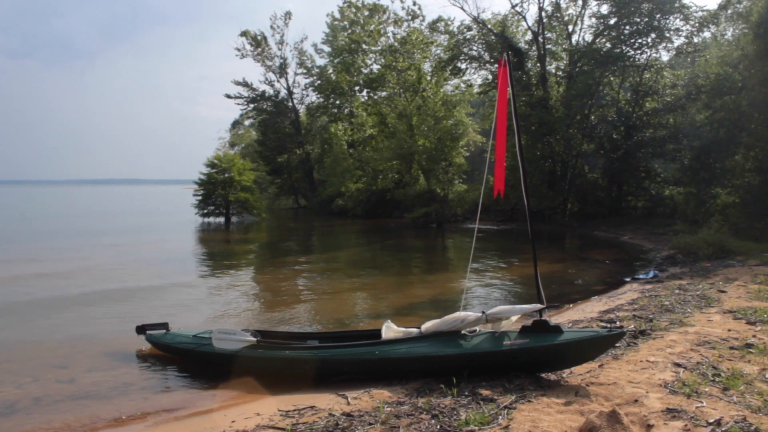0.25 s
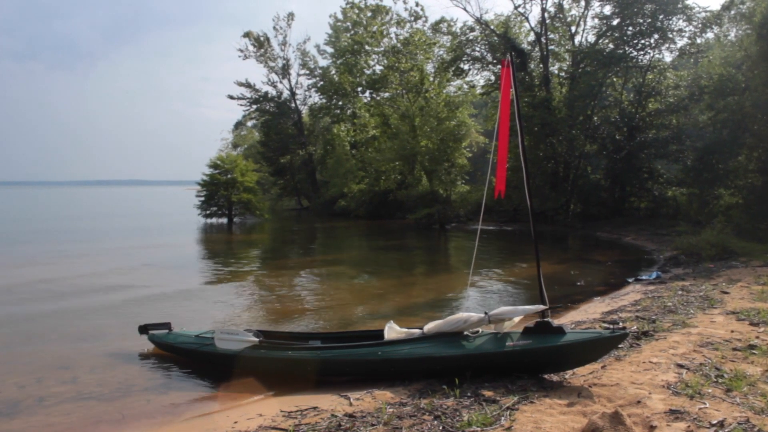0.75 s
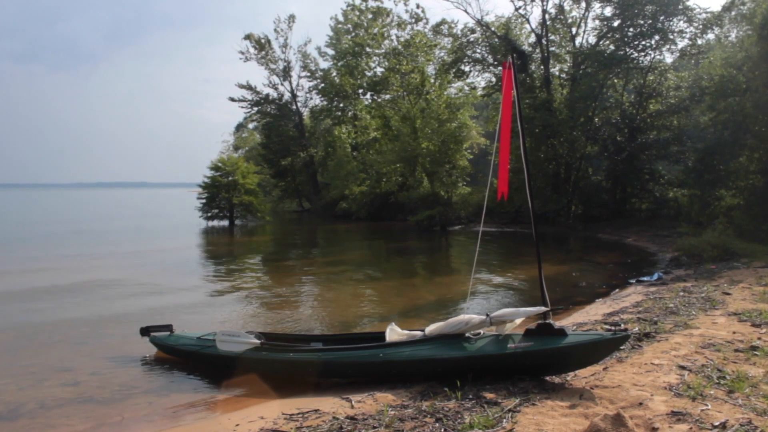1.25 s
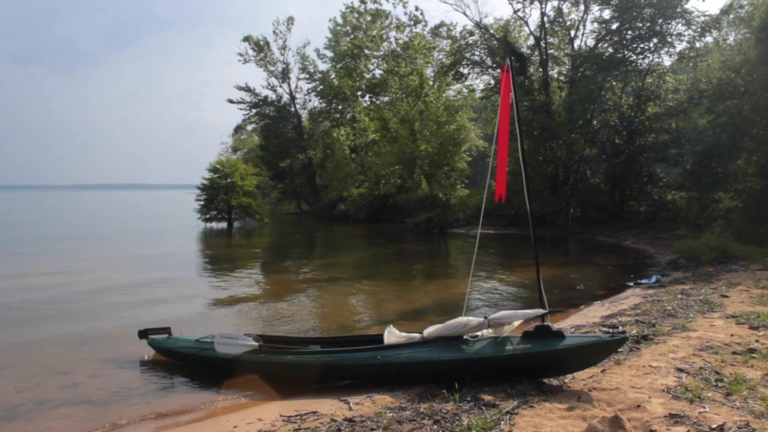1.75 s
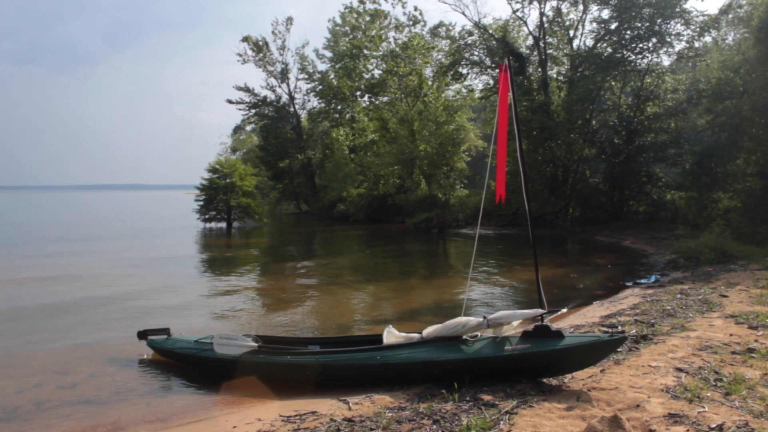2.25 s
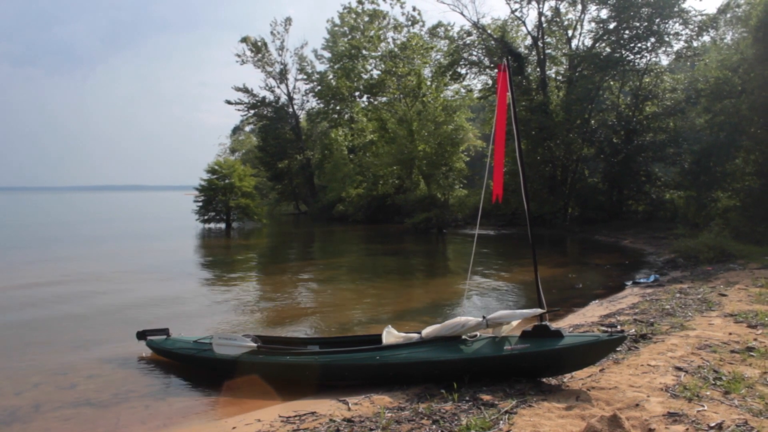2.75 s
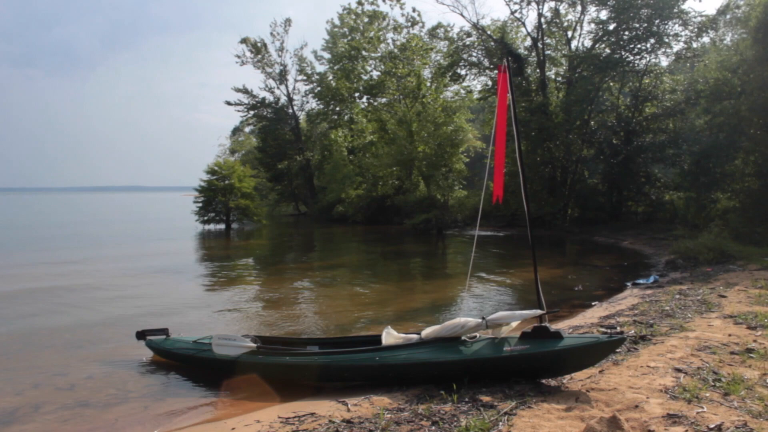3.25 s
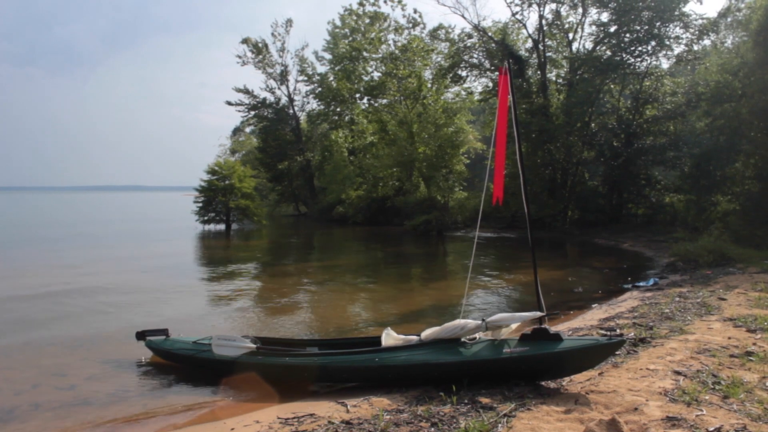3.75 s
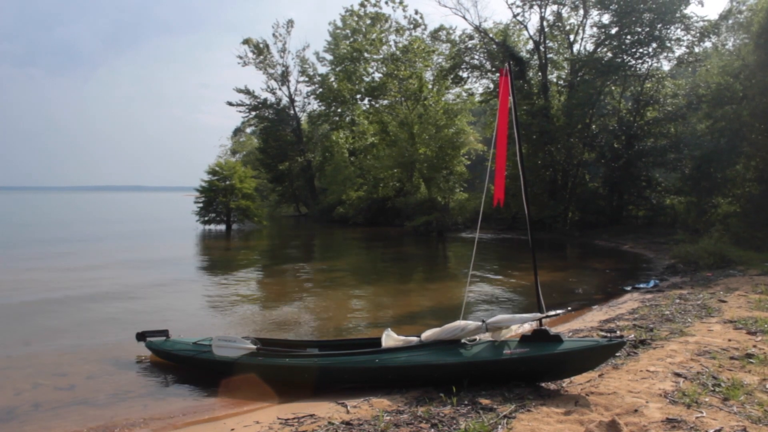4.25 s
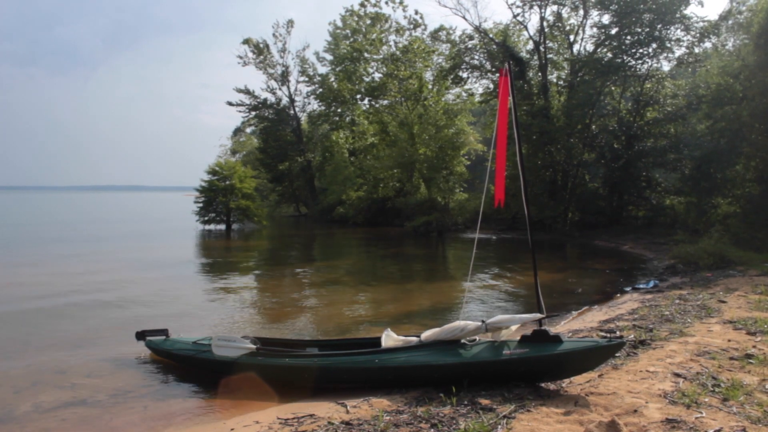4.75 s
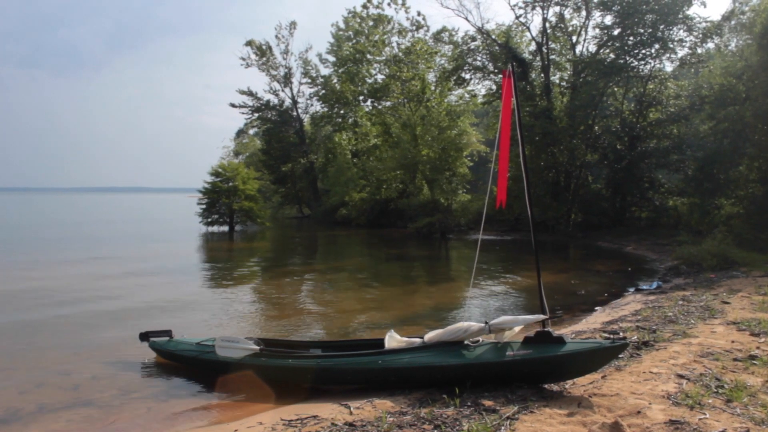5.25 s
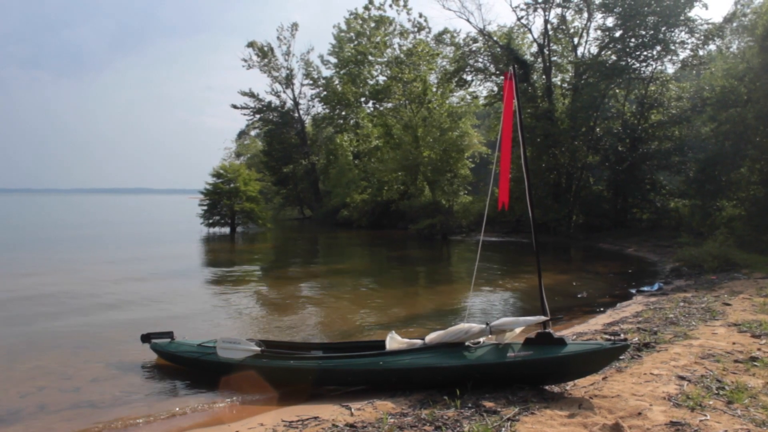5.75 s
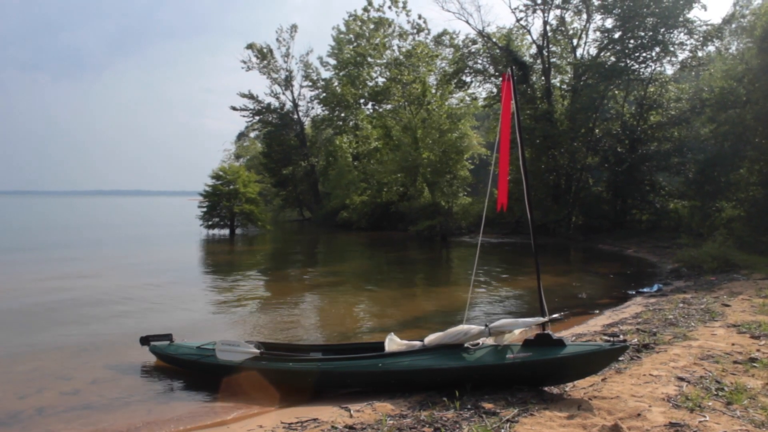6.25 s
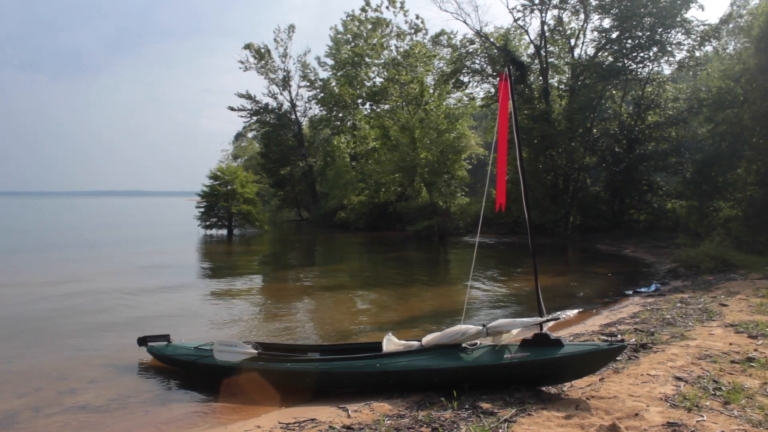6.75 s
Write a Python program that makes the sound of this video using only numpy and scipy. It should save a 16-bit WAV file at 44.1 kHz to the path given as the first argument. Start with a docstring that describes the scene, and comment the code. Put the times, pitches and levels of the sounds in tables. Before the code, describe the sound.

Small waves lap a sandy lake shore close to the microphone, sloshing with bubbles, gurgles, plinks and light splashes. The water eases briefly in the middle, then returns in two stronger washes, each trailing a soft hiss of foam. A songbird whistles short slurred phrases about once a second, echoing slightly off the trees, with fainter calls farther away. A low distant drone and soft open air lie underneath.

```python
"""Lapping lake shore with songbirds

Small waves lap the sand beside a beached kayak, trapping air that rings as clouds of bubbles,
with gulps, rising gurgles, smacks, spray and a hiss of foam on top.
Songbirds whistle short slurred phrases, and the bank and trees echo them.
Underneath sits a bed of low far drone and softly hissing open air."""
import sys
import numpy as np
from scipy import signal
from scipy.fft import rfft, irfft
from scipy.io import wavfile
from scipy.ndimage import uniform_filter1d

SR = 44100
rng = np.random.default_rng(int(sys.argv[2]) if len(sys.argv) > 2 else 0)


def store_wav(level_fs):
    """Save 16-bit WAV to argv[1]."""
    pcm = np.round(np.clip(np.atleast_2d(level_fs), -1, 1) * 32767)
    wavfile.write(sys.argv[1], SR, pcm.T.astype(np.int16))


N = 308700
TIME = np.arange(N) / SR
BINS = np.fft.rfftfreq(N, 1 / SR)

# waves running up the sand, with relative layer levels:
# (arrival [s], length [s], big bubbles [dB], small bubbles [dB], spray [dB])
WAVES = [(-.1, 0.49, -59, -51, -56.5), (0.36, .27, -53.5, -46, -52), (1.664, 0.79, -57, -51.5, -52.5),
         (2.682, 0.65, -64, -56, -65), (4.026, 0.24, -52, -48.5, -52.5), (4.199, 0.4, -49, -44.5, -52),
         (5.714, .12, -54.5, -45.5, -52), (5.826, 0.42, -50.5, -44.5, -47.5),
         (6.268, 0.36, -48, -45.5, -55), (6.67, 0.25, -75, -50.5, -60)]
# ripples between waves, on the same scale: (big bubbles [dB], small bubbles [dB], spray [dB])
LULL_DB = (-65, -69.5, -66)
# tone of the bubble clouds: (frequency [Hz], gain [dB])
WATER_EQ = [(150, -30), (280, -10.5), (450, -1.5), (900, 1), (1600, 2.5), (2400, 0.5), (3500, -6),
            (4700, -9), (7000, -16.5), (10000, -31.5), (15000, -20)]
# single close bubbles: (time [s], pitch [Hz], level [dB])
BUBBLES = [(.209, 7350, -37), (.567, 2400, -26.5), (.636, 2740, -27), (.718, 2130, -33.5),
           (.718, 1270, -33), (.795, 402, -37.5), (.8914, 2370, -22), (1.492, 6700, -37),
           (1.707, 1030, -36), (1.747, 648, -34), (1.796, 3020, -29.5), (1.878, 1790, -28.5),
           (1.888, 2110, -29), (1.896, 1170, -30.5), (2.254, 563, -40), (2.343, 1840, -28.5),
           (2.855, 823, -36), (3.882, 3330, -34.5), (4.004, 5570, -32), (4.028, 554, -36.5),
           (4.138, 3160, -28.5), (4.33, 1490, -28), (4.397, 525, -39), (4.434, 1800, -26.5),
           (4.458, 280, -26), (4.513, 477, -31), (4.616, 286, -32.5), (4.735, 1277, -28),
           (5.606, 6660, -31.5), (5.722, 530, -36), (5.765, 563, -39.5), (5.999, 435, -33.5),
           (6.116, 1605, -26), (6.535, 417, -36), (6.562, 584, -37), (6.586, 413, -33.5),
           (6.756, 2650, -28.5), (6.892, 386, -32.5), (6.93, 1640, -24.5), (6.93, 1100, -31.5)]
# shrinking air pockets: (time [s], length [s], start pitch [Hz], relative level [dB])
GURGLES = [(.853, 0.026, 1074, -40.5), (.886, 0.024, 860, -34), (2.447, 0.042, 803, -41.5),
           (2.465, 0.026, 905, -45), (4.3, 0.037, 670, -36.5), (4.466, 0.05, 599, -37),
           (4.556, 0.055, 600, -39), (4.7, 0.038, 590, -38), (6.112, .018, 1140, -29.5),
           (6.127, 0.022, 1886, -35), (6.39, 0.025, 820, -39)]
# drops and crests hitting the surface: (time [s], peak [dB], centre [Hz], width [octaves])
SMACKS = [(.025, -26.5, 2920, 0.45), (.243, -29.5, 4200, 0.72), (.687, -33, 4400, .39),
          (1.714, -34, 4000, 0.22), (1.925, -42, 4700, .3), (1.97, -39, 4570, 0.25),
          (2.04, -32.5, 3960, .25), (2.353, -26.5, 10190, 2.1), (2.857, -35, 3500, 1.8),
          (4.105, -32.5, 7250, 0.46), (4.138, -26.5, 2500, 1.7), (4.458, -27.5, 1300, 0.64),
          (4.603, -29, 6000, 1.5), (4.616, -29.5, 13200, 0.6), (5.8724, -21, 4350, 0.41),
          (5.898, -29, 3960, .3), (5.975, -31, 4560, 0.26), (6.075, -26.5, 4720, 0.29),
          (6.882, -29, 2300, .5)]
# foam as a spent wave drains through the sand: (start [s], end [s], level [dB])
FOAM = [(4.252, 4.564, -56.5), (6.24, 6.82, -56.5)]
# tone of the foam: (frequency [Hz], gain [dB])
FOAM_EQ = [(3000, -23), (5500, 1), (6800, 0.5), (8200, -5), (10500, -16), (14500, -7)]
# five bird phrases, a slur per row: (delay [s], length [s], start pitch [Hz], goal pitch [Hz], peak [dB])
REFRAIN = [(-.008, .125, 2817, 2480, -39.5), (.175, .08, 3440, 2900, -28),
           (0.356, 0.0724, 2600, 2988, -27.5), (0.402, .1, 2690, 2640, -35.5)]
ARCH = [(0, 0.072, 2150, 2360, -46.5), (.1, 0.067, 2380, 2680, -36.5), (.24, 0.051, 2765, 3080, -34.5),
        (.268, .105, 3270, 1956, -35), (.44, .125, 2200, 2900, -40.5)]
FALL = [(0, 0.053, 3180, 2450, -45.5), (.05, 0.0975, 3276, 3050, -35), (0.206, .14, 3270, 2500, -35)]
DIP = [(0, 0.084, 2480, 2160, -41.5), (0.094, 0.0925, 2330, 2693, -35.5)]
SWOOP = [(0, .125, 3464, 2555, -33), (.133, 0.0678, 2440, 2956, -28.5)]
# the song's cues: (start [s], phrase)
SONG = [(.595, REFRAIN), (1.775, ARCH), (2.959, FALL), (3.859, DIP), (4.571, SWOOP), (5.414, REFRAIN)]
# birds deep in the trees: (start [s], end [s], start pitch [Hz], end pitch [Hz], level [dB])
FAR_CALLS = [(1.302, 1.726, 3140, 3480, -58.5), (4.62, 5.2, 6300, 5400, -69.5),
             (4.8, 5.024, 4870, 4100, -67), (5.019, 5.251, 4650, 3870, -64.5),
             (5.273, 5.557, 4720, 3870, -64.5), (6.789, 6.949, 3900, 5920, -56.5),
             (6.907, 6.998, 6700, 7000, -60.5)]
# fader ride of the drone: (time [s], relative level [dB])
DRONE_RIDE = [(0, -45.5), (.5, -48.5), (1.5, -49.5), (3.2, -54.5), (3.8, -57), (5.2, -57.5), (5.7, -47),
              (6.6, -45.5), (7, -50)]
# tone of the drone: (frequency [Hz], gain [dB])
DRONE_EQ = [(53, -50), (90, -27), (130, -2), (178, 1), (228, -1.5), (280, -20.5), (330, -19), (430, -46),
            (730, -120)]
# tone of the open air: (frequency [Hz], gain [dB])
AIR_EQ = [(12, -49), (20, -13), (70, -6.5), (186, -6.5), (274, -11.5), (507, -15.5), (616, -12),
          (669, -17.5), (1140, -12), (2340, -19), (2930, -15.5), (3460, -22.5), (4330, -22), (6390, -26.5),
          (15600, -31)]


def waves():
    """Each wave traps big bubbles, small ones and a fizz of spray."""
    big, small, spray = wave_envelopes()
    gulps = bubble_cloud(309.6, 804, per_s=230, cycles=24, spread_db=4, rise=.54)
    ripples = bubble_cloud(750, 4200, per_s=330, cycles=36, spread_db=4.5, rise=.8)
    slosh = bubble_cloud(700, 3100, per_s=700, cycles=72, spread_db=2.8, rise=1.4)
    fizz = bubble_cloud(3030, 14860, per_s=2400, cycles=38, spread_db=4.5, rise=.2)
    # strong waves crowd their bubbles into one slosh; lulls leave only the farther shore's wash
    crowding = small ** 2 / (small ** 2 + gain_of(-48) ** 2)
    far_wash = np.minimum(gain_of(-57.5) / small, 1) ** 2
    blend = np.maximum(crowding, far_wash)
    babble = np.sqrt(1 - blend) * ripples + np.sqrt(blend) * slosh
    return gain_of(-.03) * big * gulps + gain_of(1.25) * small * babble + gain_of(1.5) * spray * fizz


def wave_envelopes(attack_s=.088, collapse_s=.11, backwash_s=1.0, spray_fade_db_per_s=14.5):
    """Gains of big bubbles, small bubbles and spray: each wave builds, runs, collapses and drains back."""
    big, small, spray = (np.full(N, gain_of(db) ** 2) for db in LULL_DB)
    for arrival, length, big_db, small_db, spray_db in WAVES:
        age = TIME - arrival
        attack = np.clip(age / attack_s, 0, 1)
        spent = np.maximum(age - length, 0)
        backwash = gain_of(-13.5) * np.exp(-spent / backwash_s)
        power = (attack * np.maximum(np.exp(-spent / collapse_s), backwash)) ** 2
        big += power * gain_of(big_db) ** 2
        small += power * gain_of(small_db) ** 2
        # the front of the wave throws most of the spray
        spray += power * gain_of(spray_db - spray_fade_db_per_s * np.clip(age, 0, length)) ** 2
    return np.sqrt([big, small, spray])


def bubble_cloud(low_hz, high_hz, per_s, cycles, spread_db, rise):
    """A stream of random bubbles, mostly faint and a few loud, compressed to a steady level."""
    out = np.zeros(N)
    for when, pitch, size, ring, glide in rng.random((int(per_s * N / SR), 5)):
        hz = low_hz * (high_hz / low_hz) ** pitch
        size_db = spread_db * min(-np.log(1 - size), 4)
        t60 = cycles * (.5 + ring) / hz
        add(out, when * N / SR, gain_of(size_db) * hz * bubble(hz, t60, rise * glide ** 2))
    out = coloured(out, WATER_EQ)
    power = signal.fftconvolve(out ** 2, np.hanning(SR // 6), "same")
    return unit_rms(out / np.sqrt(abs(power) + 1e-9))


def bubble(hz, t60, rise):
    """A bubble rings from its birth and bends up in pitch as it nears the surface."""
    t = TIME[:int(t60 * SR) + 2]
    turns = hz * t * (1 + rise * t / t60 / 2)
    attack = 1 - np.exp(-2.2 * hz * t)
    return np.sin(2 * np.pi * turns) * attack * gain_of(-60 * t / t60)


def close_bubbles():
    """Single plinks at the water's edge; smaller, higher bubbles die sooner."""
    out = np.zeros(N)
    for start, hz, db in BUBBLES:
        add(out, start, gain_of(db) * bubble(hz, t60=.042 * (hz / 1000) ** -.95, rise=.071))
    return out


def gurgles(octaves_per_s=31):
    """Air pockets shrink as the water closes on them, so their fluttering note sweeps up."""
    out = np.zeros(N)
    for start, length, first_hz, db in GURGLES:
        t = TIME[:int(length * SR)]
        note = tone(first_hz * 2 ** (octaves_per_s * t)) * signal.windows.tukey(len(t), .6)
        flutter_db = 1.6 * unit_rms(uniform_filter1d(rng.standard_normal(len(t)), SR // 300))
        add(out, start, gain_of(db - 4 + flutter_db) * note)
    return out


def smacks():
    """One sharp hit, then a scatter of droplets, both ringing the dent they make in the water."""
    out = np.zeros(N)
    t = TIME[:SR // 30]
    for start, db, hz, octaves in SMACKS:
        hit = .092 * rng.standard_normal(len(t)) * np.exp(-t / .003)
        hit[0] = 1
        edges = np.minimum(hz * 2 ** (np.array([-octaves, octaves]) / 2), [SR / 3, SR / 2 - 1])
        tick = signal.sosfilt(signal.butter(2, edges, "band", fs=SR, output="sos"), hit)
        add(out, start, gain_of(db) * tick / abs(tick).max())
    return out


def foam():
    """Countless tiny bursting bubbles merge into a soft, grainy hiss."""
    swell = np.zeros(N)
    for start, end, db in FOAM:
        add(swell, start, gain_of(db) * np.hanning(int((end - start) * SR)))
    return swell * coloured(rng.standard_normal(N), FOAM_EQ) * gain_of(3.7 * wander(90))


def songbirds():
    """Trembling whistles arrive direct; trunks and moving leaves scatter them back, smeared in pitch."""
    direct = whistles(.009 * wander(200)) * gain_of(1.6 * wander(110))
    # one strong slap off the bank beats against each gliding note
    bank = np.zeros(N)
    add(bank, .013, gain_of(-10) * direct)
    trunks = gain_of(-15) * echoes(whistles(.05 * wander(350)), t60=.14, predelay=.008)
    woods = gain_of(-12.5) * echoes(whistles(.0217 * wander(340)), t60=1.3, predelay=.034)
    return direct + bank + trunks + woods


def whistles(waver, throat_hz=2926, throat_db_per_octave=30, swell_db=17.5):
    """Slurs swell mid-note and near the throat's resonance; waver bends their pitch."""
    out = np.zeros(N)
    for start, phrase in SONG:
        for delay, length, first_hz, goal_hz, db in phrase:
            progress = np.linspace(0, 1, int(length * SR))
            # wide falls run straight; other slurs reach their goal early, then curl back
            slide = progress if goal_hz < .8 * first_hz else np.sin(np.pi / 2 * progress / .72)
            hz = first_hz + (goal_hz - first_hz) * slide
            taper_db = swell_db * abs(2 * progress - 1) ** 1.4
            off_resonance_db = throat_db_per_octave * abs(np.log2(hz / throat_hz))
            swell = gain_of(-taper_db - off_resonance_db) * signal.windows.tukey(len(hz), .15)
            bend = 1 + waver[int((start + delay) * SR):][:len(hz)]
            add(out, start + delay, gain_of(db) * swell / swell.max() * tone(hz * bend))
    return out


def far_birds():
    """Distant slurs arrive only as echo: narrow gliding bands of noise."""
    out = np.zeros(N)
    for start, end, first_hz, last_hz, db in FAR_CALLS:
        hz = np.linspace(first_hz, last_hz, int((end - start) * SR))
        blur = wander(380)[:len(hz)] * tone(hz)
        add(out, start, gain_of(db) * unit_rms(blur * signal.windows.tukey(len(hz), .6)))
    return out


def far_drone():
    """A low drone from across the lake sinks away and swells back."""
    ride_db = np.interp(TIME, *np.transpose(DRONE_RIDE))
    return coloured(rng.standard_normal(N), DRONE_EQ) * gain_of(ride_db - 2.5)


def open_air(level_db=-52):
    """A soft, gently uneven bed of hiss."""
    return coloured(rng.standard_normal(N), AIR_EQ) * gain_of(level_db + .5 * wander(3.7))


def echoes(x, t60, predelay, taps_per_s=2000):
    """A reverb tail of sparse, dying reflections of random sign."""
    t = TIME[:2 * SR]
    taps = rng.choice([-1., 1.], len(t)) * (rng.random(len(t)) < taps_per_s / SR)
    taps *= (t > predelay) * gain_of(-60 * t / t60)
    return signal.fftconvolve(x, taps / np.linalg.norm(taps))[:N]


def gain_of(db):
    """Decibels to gain."""
    return 10 ** (np.asarray(db) / 20)


def unit_rms(x):
    """Normalises to rms 1."""
    return x / np.sqrt(np.mean(x ** 2) + 1e-20)


def coloured(x, eq):
    """Runs a sound through an EQ curve and normalises to rms 1."""
    hz, db = np.transpose(eq)
    curve_db = np.interp(np.log(BINS + 1), np.log(hz), db)
    return unit_rms(irfft(rfft(x) * gain_of(curve_db), N))


def tone(hz):
    """A sine that follows a pitch curve."""
    return np.sin(2 * np.pi * np.cumsum(hz) / SR)


def wander(bandwidth_hz):
    """A smooth random modulator of rms 1."""
    return unit_rms(irfft(rfft(rng.standard_normal(N)) * np.exp(-(BINS / bandwidth_hz) ** 2), N))


def add(mix, start_s, sound):
    """Drops a sound into the mix at its cue."""
    part = mix[max(round(start_s * SR), 0):][:len(sound)]
    part += sound[:len(part)]


def scene():
    """Mono mix: water up front with a brief scatter off hull and bank, then birds and the bed."""
    water = waves() + close_bubbles() + gurgles() + smacks() + foam()
    scatter = gain_of(-10) * echoes(water, t60=.16, predelay=.003)
    return (water + scatter + songbirds() + far_birds() + open_air() + far_drone())[None]


def record(dry):
    """A steep high cut trims the very top of the mix."""
    high_cut = signal.firwin(2001, 15750, window=("kaiser", 9), fs=SR)
    return signal.oaconvolve(dry, high_cut[None], "same")


dry = scene()
out = record(dry)
store_wav(out)
```